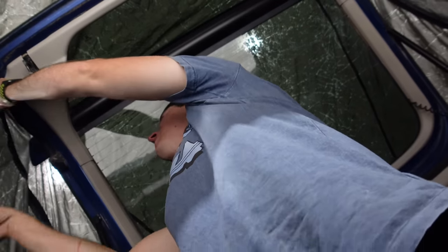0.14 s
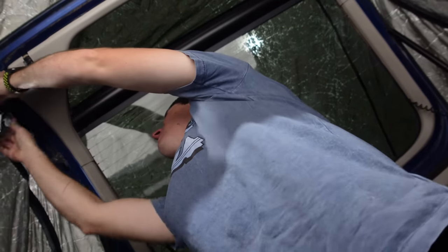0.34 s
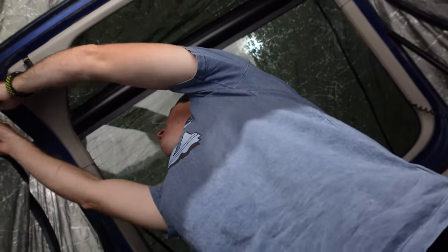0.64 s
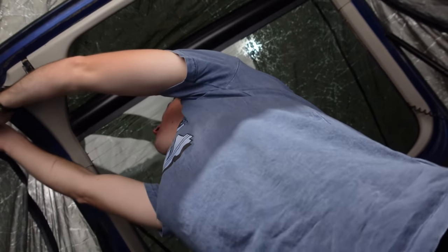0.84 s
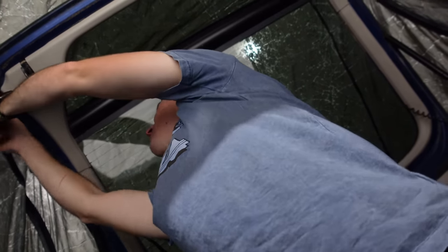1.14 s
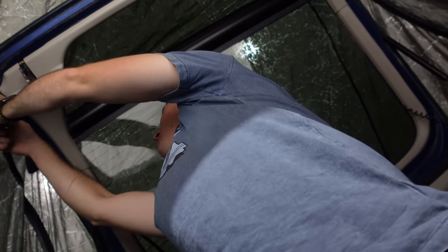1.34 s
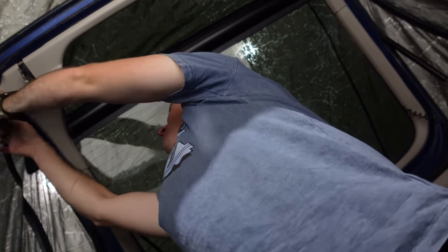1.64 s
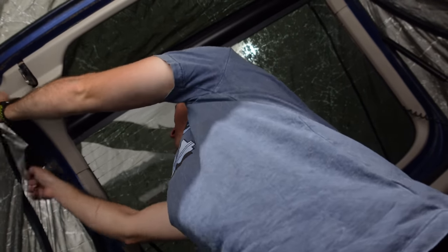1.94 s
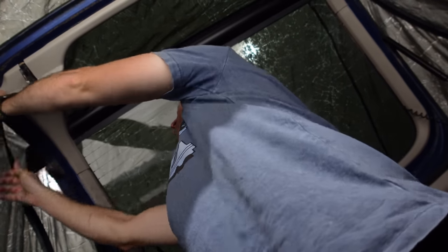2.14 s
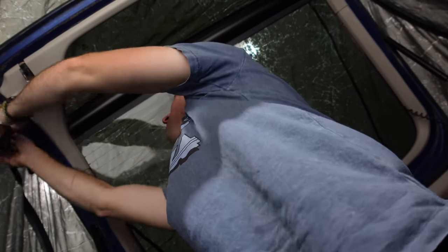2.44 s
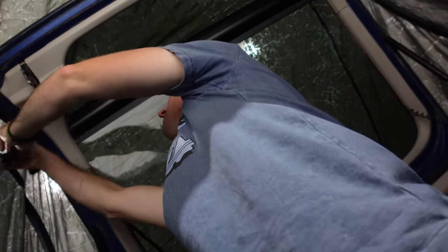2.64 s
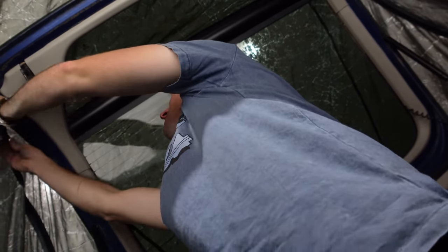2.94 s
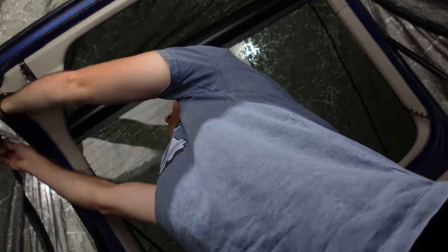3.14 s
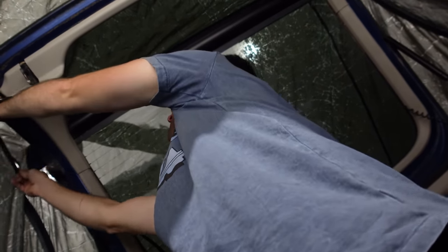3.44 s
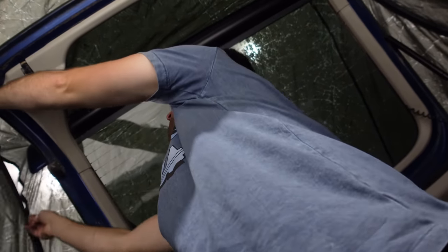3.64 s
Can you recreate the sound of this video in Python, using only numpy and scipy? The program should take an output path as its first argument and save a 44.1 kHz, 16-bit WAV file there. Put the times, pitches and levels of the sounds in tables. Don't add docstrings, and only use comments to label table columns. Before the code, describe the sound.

A nylon tent zipper is tugged, catches, then runs open fast amid rustling taut fabric

```python
import sys
import numpy as np
from scipy import signal
from scipy.fft import rfft, irfft
from scipy.io import wavfile
from scipy.ndimage import uniform_filter1d

SR = 44100
rng = np.random.default_rng(int(sys.argv[2]) if len(sys.argv) > 2 else 0)


def volts_from_db(level):
    exponent = np.asarray(level, float) / 20
    return 10 ** exponent


def materialize(psi):
    bounded = np.clip(np.atleast_2d(psi).T, -1, 1)
    quanta = np.round(bounded * 32767).astype(np.int16)
    wavfile.write(sys.argv[1], SR, quanta)


N = 167580


def level(x, db):
    return x * volts_from_db(db) / np.sqrt(np.mean(x ** 2))


def band(x, hz, width_hz):
    return signal.lfilter(*signal.iirpeak(min(hz, .45 * SR), hz / width_hz, fs=SR), x)


def shade(points, hz):
    points_hz, points_db = np.array(points).T
    return np.interp(np.log(hz), np.log(points_hz), points_db)


def tinted(points):
    hz = np.maximum(np.arange(N // 2 + 1) * SR / N, 1)
    inside = (hz >= points[0][0]) & (hz <= points[-1][0])
    spectrum = rfft(rng.standard_normal(N)) * volts_from_db(shade(points, hz)) * inside
    return level(irfft(spectrum, N), 0)


def walk(rate_hz):
    hold = int(SR / rate_hz)
    steps = np.repeat(rng.standard_normal(N // hold + 1), hold)
    smooth = uniform_filter1d(uniform_filter1d(steps, hold), hold)[:N]
    return smooth / smooth.std()


def body(x, peaks, patchy_db):
    out = np.zeros(N)
    for k, (hz, width_hz, db) in enumerate(peaks):
        out += (-1) ** k * volts_from_db(db + patchy_db * walk(20)) * band(x, hz, width_hz)
    return out


def add(out, start_s, x):
    i = int(start_s * SR)
    out[i:i + len(x)] += x[:len(out) - i]


# time_s, teeth_hz, buzz_db, hiss_db, rough (0-1), rattle_db
PULLS = [
    [(1.742, 189.7, -49, -57, 0.64, -36.5), (1.765, 255, -31, -41.5, 0.37, -29),
     (1.8, 365, -33, -34, 0.28, -30.5), (1.826, 445, -32, -31.5, 0.19, -30.5),
     (1.843, 425, -23, -30.5, 0.18, -30), (1.852, 449, -31.5, -31.5, 0.2, -31),
     (1.863, 455, -22, -30.5, .15, -32), (1.884, 385, -32.5, -34, .4, -33),
     (1.93, 248, -48, -43.5, 0.8, -42)],
    [(3.192, 155, -56, -43.5, .9, -39), (3.22, 279.3, -38, -30.5, 0.78, -34.5),
     (3.245, 323.5, -45, -32, 0.76, -33.5), (3.28, 261.5, -49, -41, 0.75, -38),
     (3.3, 149.3, -52, -49, 0.77, -45.5), (3.349, 150, -42, -43, 0.42, -32)],
    [(3.35, 198, -44, -35, .6, -36), (3.384, 279.5, -35, -30, 0.63, -28),
     (3.416, 323.4, -34, -26.5, 0.43, -28), (3.444, 371.6, -24, -24, 0.17, -25.5),
     (3.462, 354.5, -27, -26.5, 0.15, -22), (3.473, 290.6, -32, -28, 0.33, -27),
     (3.488, 309.5, -29, -28, 0.28, -27), (3.51, 374.4, -23, -31.5, .12, -26),
     (3.52, 428, -25.5, -23.5, .3, -24)],
    [(3.5201, 790, -16.5, -24.5, 0.08, -24), (3.532, 758, -9.5, -24, 0.24, -28),
     (3.545, 620.7, -27, -23, 0.41, -27), (3.585, 594, -23.5, -22, 0.23, -34),
     (3.615, 575, -29.5, -23, .2, -37), (3.66, 612, -21, -22.5, .1, -38),
     (3.7, 633.4, -20, -24.5, .08, -38), (3.74, 645, -22, -24.5, .08, -39),
     (3.8, 669, -16, -23.5, .05, -39)],
]
# start_s, peak_db
SNAPS = [(0.2566, -33), (.3185, -45), (0.501, -49), (.575, -43.5), (0.7958, -33), (1.6855, -30),
         (1.724, -32), (1.75, -32.5), (2.039, -29.5), (2.0439, -33), (2.212, -44), (3.1927, -27),
         (3.2935, -28.5), (3.3165, -22), (3.3281, -21.5), (3.3419, -17.5), (3.3494, -21.5)]
# pitch_hz, width_hz, level_db
CLOTH = [(170, 60, -10.5), (390, 270, -1), (639, 220, -2), (891, 172, -4), (1324, 180, -5), (1880, 210, -7),
         (2760, 130, -11)]
# pitch_hz, width_hz, level_db
SLIDER = [(1900, 1100, -4.5), (3560, 1900, -3), (5040, 1030, 2.5), (6400, 3560, -7.5), (8170, 1420, 1),
          (10900, 12200, -10), (13500, 4200, -9.5)]
# pitch_hz, width_hz, level_db
RATTLE = [(300, 206, -8.5), (570, 270, -5), (880, 173, -0.5), (1184, 294, -8), (1650, 570, -14.5)]
PERIOD_JITTER, DRIFT, SIZE_JITTER_DB, THROB_DB = 0.3013, .008, 3, 2.2
GATE_SHARE, GATE_FLOOR = 0.45, 0.59
SHAKE_DB, PATCHY_DB = -15, 1.5
SNAP_S, SNAP_BODY_S, SNAP_BODY_DB = .002, .00025, -8


def zipper():
    t = np.arange(N) / SR
    buzz, hiss, low, rattle = np.zeros((4, N))
    wobble, sizes = walk(400), walk(150)
    air = rng.standard_normal(N)
    throb = volts_from_db(THROB_DB * walk(70))
    rasp = rng.standard_normal(N)
    shake = level(band(air, 127, 154), SHAKE_DB)
    drift = walk(35)
    for pull in PULLS:
        time_s, teeth_hz, buzz_db, hiss_db, rough, rattle_db = np.array(pull).T
        on = (t >= time_s[0]) & (t <= time_s[-1])
        hz = np.interp(t, time_s, teeth_hz)
        rough = np.clip(np.interp(t, time_s, rough), 0, 1)
        buzz_gain = volts_from_db(np.interp(t, time_s, buzz_db))
        hiss_gain = volts_from_db(np.interp(t, time_s, hiss_db))
        rattle_gain = volts_from_db(np.interp(t, time_s, rattle_db))

        uneven_hz = hz * np.exp(PERIOD_JITTER * rough * wobble + DRIFT * drift)
        phase = np.cumsum(on * uneven_hz) / SR % 1
        size = on * volts_from_db(SIZE_JITTER_DB * rough * sizes)
        kick_width = .003 * np.minimum(620 / hz, 1.6) ** 6
        kick = np.exp(-np.minimum(phase, 1 - phase) ** 2 / kick_width)
        buzz += size * buzz_gain * throb * (kick - uniform_filter1d(kick, size=400))
        rattle += size * throb * rattle_gain * (.3 + np.exp(-phase / 0.31)) * rasp
        low += on * hiss_gain * shake
        hiss += size * hiss_gain * (GATE_FLOOR + np.exp(-phase / GATE_SHARE)) * air
    k = np.arange(600) / SR
    for start_s, peak_db in SNAPS:
        add(hiss, start_s, volts_from_db(peak_db) * rng.standard_normal(600) * np.exp(-k / SNAP_S))
        add(buzz, start_s, volts_from_db(peak_db + SNAP_BODY_DB) * np.exp(-k / SNAP_BODY_S))
    cloth = volts_from_db(14.5) * body(buzz, CLOTH, PATCHY_DB)
    teeth = volts_from_db(5) * body(hiss, SLIDER, PATCHY_DB / 2)
    return cloth + teeth + low + volts_from_db(21) * body(rattle, RATTLE, PATCHY_DB)


# middle_s, length_s, pitch_hz, level_db. Most are slider catches; the one at 3.148
# s is the low body of a tap on the wall, before the slider moves.
SCRAPES = [(1.768, 0.018, 934, -31.5), (1.771, .012, 1930, -37), (1.91, .025, 160, -38),
           (3.148, .014, 250, -39), (1.985, 0.0082, 1900, -30.5), (3.29, .03, 170, -40.5),
           (3.407, 0.028, 170, -33.5), (3.424, 0.024, 5000, -33), (3.48, .018, 880, -21.5),
           (3.531, 0.0095, 1518, -28)]


def scrapes():
    t, air, out = np.arange(N) / SR, rng.standard_normal(N), np.zeros(N)
    for middle_s, length_s, hz, db in SCRAPES:
        narrow = band(band(air, hz, hz / 5), hz, hz / 5)
        out += np.exp(-((t - middle_s) / length_s) ** 2) * level(narrow, db)
    return out


# start_s, peak_db, flap_hz, boom_db
FLAPS = [(.020, -36.5, 197, -33.5), (0.27, -32.5, 103, -38), (0.299, -38, 88, -53), (0.373, -26, 740, -41),
         (.6, -42, 100, -34), (.667, -16.5, 192, -21), (0.73, -34.5, 303, -32.5), (0.95, -40, 235, -33),
         (1.103, -45, 117, -40), (1.231, -39, 364, -45), (1.452, -23.5, 563, -37.5), (1.523, -25, 900, -48),
         (1.670, -31, 448, -51), (1.923, -23, 685, -30), (1.967, -14, 1082, -33), (1.984, -11.5, 840, -26),
         (2.089, -29, 593, -35), (2.124, -12.5, 199, -18.5), (2.156, -13.5, 164, -35),
         (2.170, -20, 294, -25), (2.48, -29, 590, -35.5), (2.671, -29.5, 300, -43), (3.134, -35, 195, -30)]
FLAP_CYCLES, FLAP_RAG_DB, FLAP_TOP_HZ, BOOM_HZ, BOOM_S = 1.8, 7.5, 2870, 23, 0.045


def flaps():
    out, k = np.zeros(N), np.arange(8000) / SR
    for start_s, peak_db, hz, boom_db in FLAPS:
        fade = np.exp(-k * hz / FLAP_CYCLES)
        puff = rng.standard_normal(8000) * fade
        rag = band(band(puff, hz, 2.5 * hz), FLAP_TOP_HZ / 3, FLAP_TOP_HZ) * np.sqrt(300 / hz)
        kick = np.cos(2 * np.pi * (hz * k) ** .9) * fade * np.minimum(k / .0006, 1)
        boom_turns = BOOM_HZ * k + 1 - np.exp(-2 * k / BOOM_S)
        boom = np.sin(2 * np.pi * boom_turns) * np.exp(-k / BOOM_S)
        add(out, start_s, volts_from_db(peak_db - 2) * (kick + volts_from_db(FLAP_RAG_DB) * rag) + volts_from_db(boom_db) * boom)
    return out


# start_s, peak_db, push_ms
TAPS = [(0.0198, -26, 0.32), (.269, -24, 0.98), (.279, -26.5, 2), (.372, -22, .25), (.582, -39, 0.36),
        (.605, -31, 0.63), (.629, -31.5, 0.68), (.841, -39, 0.91), (.948, -35, 0.83), (1.109, -29.5, 1.4),
        (1.67, -31, .3), (2.088, -20.5, 0.29), (2.672, -30.5, 0.31)]
REBOUND = 0.45


def taps():
    out = np.zeros(N)
    for start_s, peak_db, push_ms in TAPS:
        x = np.arange(2000) / SR * 1000 / push_ms
        push = np.exp(-(x - 1.5) ** 2)
        rebound = REBOUND * np.exp(-((x - 4.5) / 2.0) ** 2)
        add(out, start_s, volts_from_db(peak_db) * (push - rebound))
    return out


# pitch_hz, level_db, t60_s
TAB = [(4549, -2, .03), (7477, -15, .05), (11090, -1, .042), (15510, -24, .07)]
# start_s, peak_db
JINGLES = [(.184, -60), (.237, -56), (.257, -50), (.515, -59), (.657, -60), (.71, -52), (.759, -52),
           (.843, -58), (1.958, -42), (1.966, -37), (2.174, -29)]
# start_s, peak_db, pitch_hz
KNOCKS = [(.513, -38.5, 4530), (.517, -48, 10500), (.657, -42, 10000), (1.958, -29, 4550),
          (1.969, -20, 10800), (1.687, -24.5, 9900), (1.959, -26, 8360), (1.963, -27, 8600),
          (1.966, -17.5, 8600), (1.971, -17, 8540), (1.983, -28, 13400), (1.972, -27, 12600),
          (2.173, -25, 9700), (2.178, -24, 9700)]


def tab():
    out, k = np.zeros(N), np.arange(5000) / SR
    for start_s, peak_db in JINGLES:
        for hz, mode_db, t60_s in TAB:
            gain = volts_from_db(peak_db + mode_db + 2 * rng.standard_normal())
            add(out, start_s, gain * np.sin(2 * np.pi * hz * k) * 1000. ** (-k / t60_s))
    for start_s, peak_db, hz in KNOCKS:
        shape = np.exp(-k / 0.0011) * np.minimum(k / 0.0003, 1)
        add(out, start_s, volts_from_db(peak_db) * np.sin(2 * np.pi * hz * k) * shape)
    return out


# start_s, length_s, level_db, tilt_db_per_octave
SWISHES = [(0, 0.0074, -45, -2), (0.047, 0.13, -53, -1.5), (0.215, 0.069, -49, -0.5),
           (0.322, 0.052, -39.5, 0.5), (0.393, 0.042, -44.5, 4.5), (0.453, 0.26, -65.5, -4.5),
           (0.667, 0.079, -50, 0.5), (0.786, 0.006, -49, 0), (0.843, 0.019, -48.5, -1.5),
           (0.94, 0.11, -54.5, -2.5), (1.077, 0.015, -44, -0.5), (3.032, 0.1, -54, -0.5),
           (1.216, 0.031, -48.5, 0), (1.294, 0.065, -50.5, 2), (1.379, .06, -51, 0),
           (1.437, 0.021, -44.5, -2.5), (1.489, 0.068, -41.5, 0), (1.541, 0.044, -41, -2),
           (1.639, 0.3, -46, -2.5), (1.943, 0.046, -34.5, -3), (2.032, 0.017, -45.5, -3),
           (2.096, 0.074, -47, 0.5), (2.187, 0.18, -56, -2), (2.337, 0.13, -42.5, 0.5),
           (2.44, 0.16, -43.5, 0.5), (2.643, 0.084, -48.5, -1), (2.792, 0.021, -43.5, -1),
           (2.84, 0.096, -45.5, -0.5), (2.955, 0.045, -43.5, 0), (3.121, 0.14, -46, -2)]
# pitch_hz, level_db_per_hz
SWISH_COLOUR = [(180, -7.5), (700, -6), (3260, -14), (7530, -13.5), (11000, -24), (15800, -70)]
SWISH_RISE_S, SWISH_FALL_S, SWISH_GRAIN_DB, SWISH_DB = .028, .06, 2.5, -6


def swishes():
    coarse = np.arange(0, N, 64)
    t, out, grain = coarse / SR, np.zeros(N), walk(300)
    start_s, length_s, db, tilt_db = np.array(SWISHES).T[:, :, None]
    rise = np.clip((t - start_s) / SWISH_RISE_S + .5, 0, 1)
    fall = np.exp(-np.maximum(t - start_s - length_s, 0) / SWISH_FALL_S * 2)
    shape = (rise * fall) ** 2
    for hz in 180 * 2 ** np.arange(0, 6.6, .5):
        power = (shape * volts_from_db(2 * (db + tilt_db * np.log2(hz / 4000)))).sum(axis=0)
        gain = np.interp(np.arange(N), coarse, np.sqrt(power))
        colour_db = shade(SWISH_COLOUR, hz) + 10 * np.log10(hz / 1000)
        colour_db = colour_db + SWISH_GRAIN_DB * grain + 3.07 * walk(25.11)
        out += gain * volts_from_db(colour_db) * level(band(rng.standard_normal(N), hz, hz / 3.27), 0)
    return volts_from_db(SWISH_DB) * out


ROOM_T60_S, ROOM_DB = .12, -16


def tent(near):
    k = np.arange(12000) / SR
    tail = rng.standard_normal(12000) * 1000. ** (-k / ROOM_T60_S) * np.minimum(k / 0.0016, 1)
    tail *= volts_from_db(ROOM_DB) / np.sqrt(np.sum(tail ** 2))
    return signal.fftconvolve(near, tail)[:N]


# pitch_hz, level_db_per_hz
RUMBLE = [(8.8, -47), (24, 5.5), (44, -9), (183, -16), (317, -31), (400, -26.5), (520, -29), (880, -120)]
RUMBLE_DB, RUMBLE_WALK_DB = -42, 2.5


def rumble():
    return tinted(RUMBLE) * volts_from_db(RUMBLE_DB + RUMBLE_WALK_DB * walk(13) - 2)


# pitch_hz, level_db_per_hz
FLOOR = [(120, -49), (200, 0.5), (334, -13), (746, -2.5), (2400, -10.5), (7330, -17.5), (13900, -26),
         (15800, -44)]
FLOOR_DB = -58.5


def garage():
    return tinted(FLOOR) * volts_from_db(FLOOR_DB + 0.5 * walk(7.8))


def scene():
    near = zipper() + swishes() + flaps() + taps() + tab()
    room = tent(near)
    bed = rumble() + garage()
    return np.tile(near + scrapes() + room + bed, (2, 1))


def roll_off(x):
    return signal.sosfilt(signal.butter(12, 16500, fs=SR, output="sos"), x)


def record(dry):
    top_cut = signal.ellip(8, .2, 60, 15850, fs=SR, output="sos")
    return roll_off(signal.sosfilt(top_cut, dry))


dry = scene()
out = record(dry)
materialize(out)
```